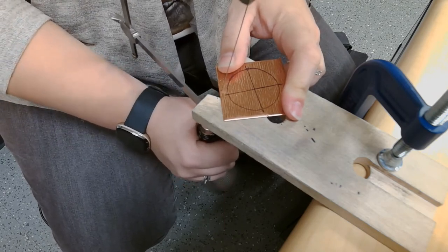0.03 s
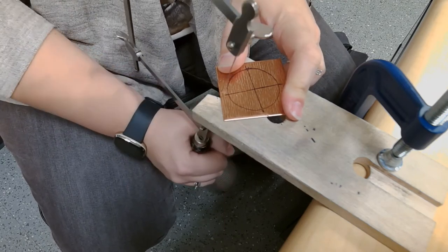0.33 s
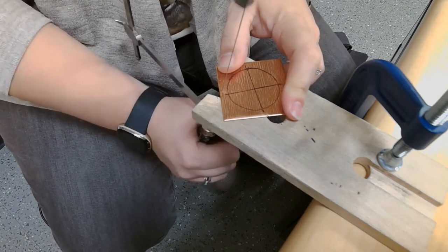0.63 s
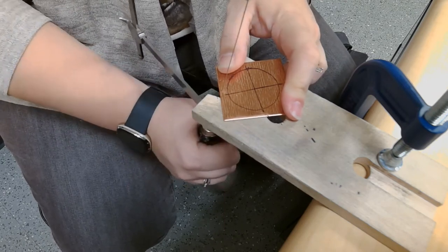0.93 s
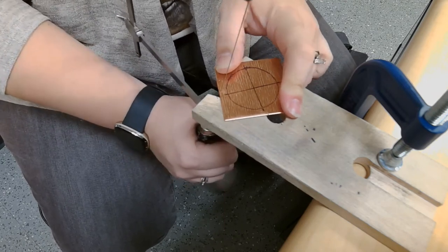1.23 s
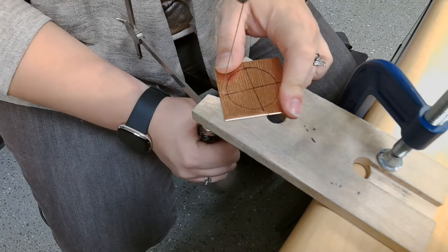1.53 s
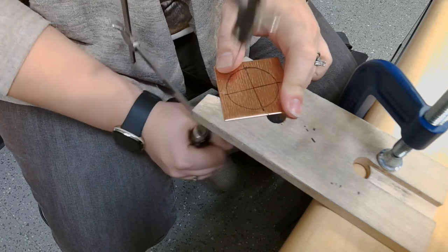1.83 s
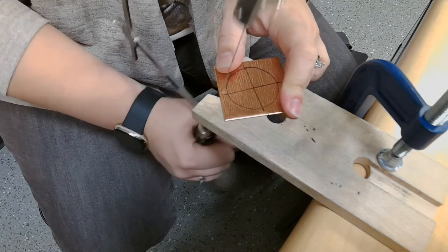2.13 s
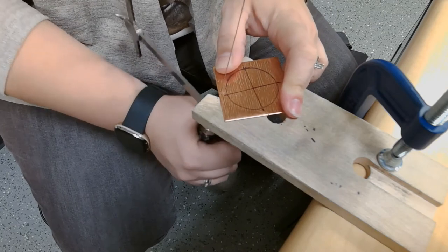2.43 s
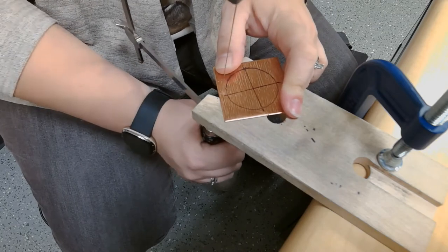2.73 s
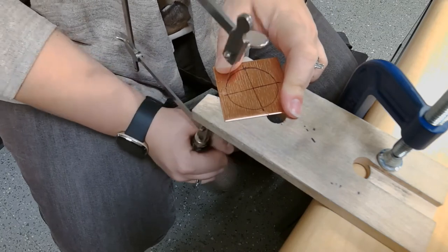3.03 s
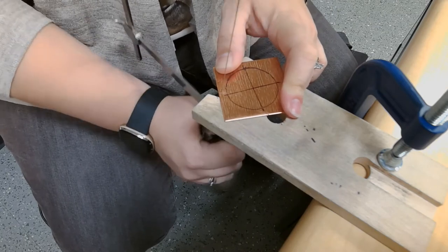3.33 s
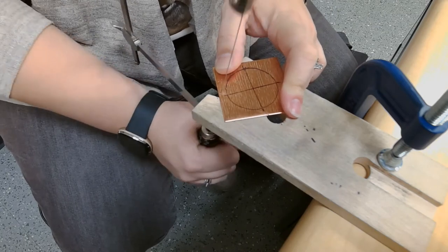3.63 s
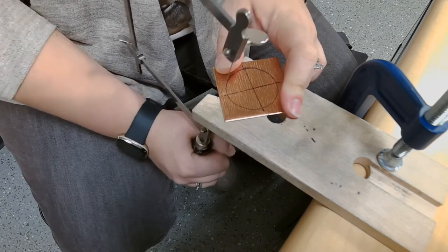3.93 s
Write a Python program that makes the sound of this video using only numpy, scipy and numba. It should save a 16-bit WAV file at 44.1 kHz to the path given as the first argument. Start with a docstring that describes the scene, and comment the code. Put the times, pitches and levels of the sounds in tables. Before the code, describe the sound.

A fine saw cuts copper sheet in short, raspy strokes with brief pauses.

```python
"""Sawing a copper sheet

A jeweller's saw cuts copper held on a wooden bench pin, close by in a dry, quiet workshop.
Each stroke speeds up and slows down; the teeth strike the copper and shake sheet, blade and wood.
Cutting strokes rasp hard and return strokes slide lightly. Caught teeth snap free with sharp ticks,
friction makes the blade squeal briefly, and the steel frame rings faintly."""
import sys
import numpy as np
from scipy import signal
from scipy.fft import rfft, irfft
from scipy.io import wavfile
from scipy.ndimage import uniform_filter1d
from numba import njit

SR = 44100
rng = np.random.default_rng(int(sys.argv[2]) if len(sys.argv) > 2 else 0)


def inscribe(sig):
    """Save sig as 16-bit PCM at rate SR to the path in sys.argv[1].

    A 1-D sig is mono; a 2-D sig holds one channel per row.
    Samples are clipped to [-1, 1] before scaling.
    """
    pcm = np.round(np.clip(np.atleast_2d(sig).T, -1, 1) * 32767)
    wavfile.write(sys.argv[1], SR, pcm.astype(np.int16))


N = 176400  # 4 seconds

# Loudness curves, one for each cutting stroke, return stroke and short nudge of the blade.
# Each row: time in seconds, then relative levels in dB of the rasp, the pin's hum and the bench's thud.
CUT_STROKES = [
    [(.022, -52, -49, -29), (.028, -17.5, -52, -37), (.055, -19, -36, -28.5), (.16, -17.5, -26.5, -25),
     (.225, -27.5, -32, -31.5), (.275, -62, -52, -33.5), (.36, -92, -58, -49)],
    [(1.711, -28.5, -47, -52), (1.745, -18, -30, -28.5), (1.795, -18.5, -40, -34), (1.84, -18, -40.5, -29),
     (1.875, -35, -26, -30.5), (1.905, -52.5, -45, -37), (1.94, -56, -53, -40)],
    [(2.816, -23, -45, -46), (2.86, -14.5, -24, -23.5), (2.895, -18, -35, -33.5),
     (2.945, -16.5, -29.5, -29), (2.975, -26.5, -28.5, -36), (3.0, -36.5, -33.5, -49),
     (3.03, -52, -46, -38)],
    [(3.498, -26, -47, -55), (3.57, -31, -33, -28.5), (3.61, -25, -32.5, -34.5), (3.705, -18, -25, -24.5),
     (3.76, -21, -31.5, -34), (3.825, -22.5, -28.5, -24.5), (3.90, -51, -42.5, -36),
     (3.93, -47.5, -41, -49)],
]
RETURN_STROKES = [
    [(.39, -59.5, -71, -50), (.41, -43, -57.5, -59), (.485, -31.5, -47.5, -49.5), (.535, -31.5, -25, -46),
     (.57, -28.5, -36.5, -41), (.61, -34.5, -33.5, -34.5), (.70, -49.5, -44.5, -36.5),
     (.79, -94.5, -69, -50.5)],
    [(1.94, -55.5, -61, -38.5), (1.99, -36, -45.5, -46.5), (2.09, -29, -41, -47.5), (2.145, -27, -31, -48),
     (2.205, -28, -33, -40), (2.25, -42.5, -34.5, -33.5), (2.31, -62.5, -50, -53.5),
     (2.42, -65.5, -61, -49)],
    [(3.03, -50.5, -53, -42), (3.08, -33, -37.5, -36), (3.16, -28.5, -40, -47), (3.235, -24.5, -23, -43),
     (3.29, -28.5, -34.5, -32.5), (3.33, -49.5, -35, -47), (3.39, -69.5, -55, -62),
     (3.49, -73.5, -59.5, -61)],
    [(3.937, -27.5, -44, -43.5), (4.0, -31.5, -35, -34)],
]
BLADE_NUDGES = [
    [(1.418, -62, -78.5, -58), (1.426, -20, -50, -43), (1.44, -38.5, -49, -43), (1.485, -65, -65, -42),
     (1.53, -98.5, -76, -73)],
    [(2.425, -46, -76, -62), (2.44, -18.5, -52, -43), (2.46, -19, -39.5, -39), (2.495, -44.5, -49, -31.5),
     (2.57, -76, -66.5, -57.5)],
]
# Sweeps of the arm. Each row: start and end in seconds, teeth per second at top speed.
ARM_SWEEPS = [(0.0, 0.279, 563), (0.351, 0.692, 440), (1.40, 1.528, 287), (1.698, 1.921, 672),
              (1.927, 2.321, 492), (2.411, 2.529, 344), (2.80, 3.019, 765), (2.981, 3.381, 461),
              (3.499, 3.90, 548), (3.901, 4.202, 485)]
# Teeth that catch and snap free. Each row: time in seconds, relative level in dB.
TOOTH_SNAGS = [(.134, -8), (.238, -25.5), (.507, -11), (.527, -10), (0.536, -14), (0.547, -13), (.575, -10),
               (.581, -9.5), (.589, -8.5), (.592, -11.5), (0.644, -14.5), (0.665, -15), (.680, -16.5),
               (1.97, -15), (2.006, -18.5), (2.147, -12.5), (2.176, -8), (2.185, -6.5), (2.195, -2.5),
               (2.260, -27.5), (2.557, -34.5), (2.868, -7.5), (2.969, -8.5), (3.191, -14), (3.236, -17.5),
               (3.256, -11), (3.262, -13.5), (3.281, -16.5), (3.513, -14.5), (3.537, -16.5), (3.569, -17),
               (3.624, -9), (3.709, -7), (3.726, -10), (3.810, -7), (3.937, -13.5)]
# Moments when the blade sings. Each row: peak time and half length in seconds, dip of the rasp in dB
# (only values below zero count), and a list of tones, each with pitch in Hz and level in dB.
BLADE_SQUEALS = [(.036, .013, -13.5, [(2480, -34.5), (3830, -34), (5900, -39)]),
                 (.05, .012, 0, [(5840, -26.5)]), (0.158, .018, 0, [(1080, -22)]),
                 (.167, 0.015, -12.5, [(2460, -21), (3800, -20), (4705, -29.5)]),
                 (0.487, 0.027, 0, [(2900, -31.5)]), (1.797, .02, -2, [(2340, -19.5), (3650, -16.5)]),
                 (2.087, 0.02, 0, [(1040, -35.5)]), (2.404, 0.047, 0, [(3700, -55)]),
                 (2.876, .012, 3, [(1540, -21)]), (2.897, 0.021, -8.5, [(2336, -15.5), (2783, -27.5),
                 (3085, -25), (3790, -15), (5690, -28.5)]), (3.49, .07, 0, [(3650, -53)]),
                 (3.749, .016, 0, [(1520, -22.5), (3700, -24), (5830, -31)])]
# Resonances of sheet and blade: the pitches at which they like to ring.
# Each row: pitch in Hz, width in Hz, strength in dB when cutting, strength in dB when sliding back.
SHEET_MODES = [(877, 110, 14.5, 5), (1073, 24, 24, 23), (1525, 90, 14, 12.5), (2438, 120, 12, 8),
               (2820, 92, 0, 3), (3155, 43, 2, -5), (3612, 140, 10.5, 10.5), (3777, 110, 6.5, 5.5),
               (5804, 150, 11.5, 5), (6740, 200, 10, 11), (7430, 230, 10, 5.5), (7790, 620, 7.5, 7.5)]
# Resonances of the wooden pin and the bench. Each row: pitch in Hz, width in Hz, relative level in dB.
PIN_MODES = [(407.3, 19, 1.5), (478.3, 64, -12)]
BENCH_MODES = [(118.6, 15, 1), (156.5, 16.5, 1), (235.3, 24, -4), (292.5, 9.6, -5)]
# Rings of the saw frame. Each row: pitch in Hz, seconds to fade by 60 dB, relative level in dB.
FRAME_RINGS = [(1090, 0.26, -24), (1540, 0.22, -26), (2340, 0.16, -23)]
# Tone colour of cutting, sliding back and the room. Each row: frequency in Hz, relative level in dB.
CUTTING_COLOUR = [(400, -8.5), (680, -10), (1250, -9), (1900, 3.5), (3100, 1), (4300, 2.5), (6200, -16),
                  (8000, -22), (9500, -29.5), (15000, -44.5)]
SLIDING_COLOUR = [(400, -29.5), (700, -9.5), (1200, -6), (1900, 3.5), (3100, 6), (4600, 4), (6200, -6.5),
                  (8000, -22.5), (9500, -25.5), (15000, -34.5)]
ROOM_COLOUR = [(15, -0.5), (69, -12), (87, -28), (127, -17.5), (556, -40), (3750, -55), (15000, -72.5)]

CUT_DB, NUDGE_DB, SNAG_DB, PIN_DB, BENCH_DB = -0.5, -5.5, 15.5, 1, -3  # added to the table levels


def from_db(db):
    """Turn decibels into a number to multiply by."""
    return 10 ** (np.asarray(db) / 20)


def normalise(x):
    """Scale a signal to an average power of 1."""
    return x / np.sqrt(np.mean(x ** 2) + 1e-18)


def steady(x, seconds):
    """Even out the slow swells of a signal but keep its fine grain."""
    power = uniform_filter1d(x ** 2, max(int(seconds * SR), 8))
    return x / np.sqrt(np.abs(power) + 1e-12)


def wander(rate_hz):
    """A smooth random wobble, about 1 in size."""
    hold = max(int(SR / rate_hz), 8)
    steps = rng.standard_normal(N // 8 + 1)[:N // hold + 1]
    return normalise(uniform_filter1d(np.repeat(steps, hold), hold))[:N]


def swell(peak_s, half_s):
    """A rounded rise and fall around one moment."""
    return np.cos(np.pi / 2 * np.clip((np.arange(N) / SR - peak_s) / half_s, -1, 1))


def filtered(x, response):
    """Filter a signal; response(hz) says how each frequency is scaled and delayed."""
    hz = np.arange(8193) * SR / 16384 + 1e-3
    return signal.oaconvolve(x, irfft(response(hz)))[:N]


def colour(hz, points):
    """A filter response that follows (Hz, dB) points and never sounds ahead of its input."""
    point_hz, db = np.array(points).T
    gain = from_db(np.interp(np.log(hz), np.log(point_hz), db))
    cepstrum = irfft(np.log(gain))
    cepstrum[1:len(hz) - 1] *= 2  # fold the part before time zero onto the part after it
    cepstrum[len(hz):] = 0
    return np.exp(rfft(cepstrum))


def resonances(hz, modes):
    """The filter response of several resonances added together."""
    return sum(from_db(db) / (1 + 1j * (hz ** 2 - pitch ** 2) / (hz * width))
               for pitch, width, db in modes)


@njit
def bandpass(x, centre_hz, width_hz):
    """Let through a narrow band around a pitch that may move."""
    out, band_state, low_state = np.empty(len(x)), 0., 0.
    for i in range(len(x)):
        tuning, damping = np.tan(np.pi * centre_hz[i] / SR), width_hz / centre_hz[i]
        band = (band_state + tuning * (x[i] - low_state)) / (1 + tuning * (tuning + damping))
        band_state = 2 * band - band_state
        low_state += 2 * tuning * band
        out[i] = damping * band
    return out


def background(hum_db=-50, air_db=-49.5, air_hz=25.2):
    """The workshop's low hum, with slow puffs of air stirred by the arm."""
    hum = filtered(rng.standard_normal(N), lambda hz: colour(hz, ROOM_COLOUR))
    air = filtered(rng.standard_normal(N), lambda hz: resonances(hz, [(air_hz, 30, 0)]) ** 2)
    air *= from_db(0.57 * wander(13))
    return from_db(hum_db) * normalise(hum) + from_db(air_db) * normalise(air)


def add_echoes(x, echo_db=-13.5, fade_s=0.068):
    """Quick, dense echoes bounce off the bench and the worker."""
    t = np.arange(SR // 2) / SR
    tail = rng.standard_normal(len(t)) * np.exp(-np.log(1000) * t / fade_s) * (t > .003)
    return x + from_db(echo_db) * signal.fftconvolve(x, tail / np.linalg.norm(tail))[:N]


def wood(push, modes, band_hz):
    """The teeth shake a wooden part, which hums at its low resonances."""
    hum = filtered(push, lambda hz: resonances(hz, modes))
    band = signal.butter(3, band_hz, "band", fs=SR, output="sos")
    return steady(signal.sosfilt(band, hum), seconds=0.055)


def squeals(waver=0.011, waver_hz=300, roughness=0.53):
    """Friction locks onto a few resonances and makes brief, rough tones."""
    out = np.zeros(N)
    for peak_s, half_s, _, tones in BLADE_SQUEALS:
        envelope = swell(peak_s, half_s)
        on = envelope > 1e-6
        for hz, db in tones:
            pitch = hz * (1 + waver * wander(waver_hz)[on])
            phase = 2 * np.pi * np.cumsum(pitch) / SR
            flutter = 1 + roughness * wander(waver_hz)[on]
            out[on] += from_db(db) * envelope[on] * flutter * np.sin(phase)
    return out


def snags(scrape=0.33, scrape_s=0.0028, low_cut_hz=1900):
    """A caught tooth snaps free with a click and a scrape, too quick to stir the low resonances."""
    t = np.arange(512) / SR
    push = np.zeros(N + len(t))
    for start_s, db in TOOTH_SNAGS:
        snap = (t == 0) + scrape * rng.standard_normal(len(t)) * np.exp(-t / scrape_s)
        start = int(start_s * SR)
        push[start:start + len(t)] += from_db(db + SNAG_DB) * snap / np.linalg.norm(snap)
    return signal.sosfilt(signal.butter(2, low_cut_hz, "high", fs=SR, output="sos"), push[:N])


def along_blade(push, tone, modes, delay_s=0.001083):
    """Pushes travel along the blade as bending waves, treble first; 3 kHz takes delay_s to arrive."""
    def response(hz):
        shape = colour(hz, tone) * np.exp(-4j * np.pi * delay_s * np.sqrt(3000 * hz))
        ringing_power = np.mean(np.abs(shape * (1 + resonances(hz, modes))) ** 2)
        return shape / np.sqrt(ringing_power)  # keeps the ringing metal about as strong as the push
    return filtered(push, response)


def ringing_metal(push, modes, drift=0.008, drift_hz=12, swell_db=2.5):
    """Sheet and blade ring, their resonances shifting as the contact point moves; the frame rings on."""
    out = push.copy()
    for hz, width, db in modes:
        ring = bandpass(push, hz * (1 + drift * wander(drift_hz)), float(width))
        out += from_db(db + swell_db * (wander(drift_hz) - .5)) * ring
    for hz, fade_s, db in FRAME_RINGS:
        width = np.log(1000) / (np.pi * fade_s)
        out += from_db(db) * 200 / width * bandpass(push, np.full(N, float(hz)), width)
    return out


def stroke_gains(strokes, ease_s=0.0035):
    """How strong rasp, pin and bench are over time, easing smoothly in and out."""
    t = np.arange(N) / SR
    gains = np.zeros((3, N))
    for stroke in strokes:
        times, *levels = np.array(stroke).T
        gains += [from_db(np.interp(t, times, db, left=-150, right=-150)) for db in levels]
    return uniform_filter1d(gains, int(ease_s * SR))


def tooth_rate(slowest_hz=109.2, roundness=.8):
    """Teeth passing per second: each sweep of the arm speeds up, then slows down."""
    t = np.arange(N) / SR
    rate = np.full(N, slowest_hz)
    for start, end, top_rate in ARM_SWEEPS:
        progress = np.clip((t - start) / (end - start), 0, 1)
        rate = np.maximum(rate, top_rate * np.abs(np.sin(np.pi * progress)) ** roundness)
    return rate


def teeth(rate, jitter, scatter_db, grit, grit_cycles):
    """Each tooth makes one uneven click, followed by the gritty noise of its chip."""
    teeth_passed = np.cumsum(rate * np.exp(jitter * wander(300))) / SR
    tooth = teeth_passed.astype(int)
    strength = from_db(scatter_db * np.clip(rng.standard_normal(N), -2, 2))[tooth]
    clicks = np.diff(tooth, prepend=0) * strength
    chips = strength * np.exp(-(teeth_passed % 1) / grit_cycles) * rng.standard_normal(N)
    return normalise(clicks) + grit * normalise(chips)


def rasp(push, gain, chatter_db, chatter_hz):
    """Teeth scrape the copper as the blade chatters in its slot; they bite less in some squeals."""
    dip_db = sum(min(db, 0) * swell(peak_s, half_s) for peak_s, half_s, db, _ in BLADE_SQUEALS)
    chatter = from_db(chatter_db * wander(chatter_hz))
    return gain * from_db(dip_db) * steady(push * chatter, seconds=0.021)


def scene():
    """The saw cuts, slides back, snags and squeals, shaking the wood in the quiet room."""
    rate = tooth_rate()
    cut, back, nudge = map(stroke_gains, (CUT_STROKES, RETURN_STROKES, BLADE_NUDGES))
    pressed = [(hz, width, db) for hz, width, db, _ in SHEET_MODES]
    loose = [(hz, width, db) for hz, width, _, db in SHEET_MODES]
    biting = teeth(rate, jitter=.04, scatter_db=3.5, grit=1.0, grit_cycles=1.0)
    sliding = teeth(rate, jitter=.035, scatter_db=1.5, grit=3.7, grit_cycles=0.86)
    cutting = from_db(CUT_DB) * rasp(biting, cut[0], chatter_db=2, chatter_hz=197.7)
    cutting += from_db(NUDGE_DB) * rasp(sliding, nudge[0], chatter_db=2, chatter_hz=251.4)
    returning = rasp(sliding, back[0], chatter_db=1.9, chatter_hz=163)
    saw = ringing_metal(along_blade(cutting, CUTTING_COLOUR, pressed), pressed)
    saw += ringing_metal(along_blade(returning + snags(), SLIDING_COLOUR, loose), loose)
    saw += squeals()
    # Cuts jolt the wood unevenly; returns and nudges bump it more regularly.
    jolting = teeth(rate, jitter=.14, scatter_db=4.5, grit=1.0, grit_cycles=1.0)
    bumping = teeth(rate, jitter=.045, scatter_db=1.5, grit=0.92, grit_cycles=0.35)
    for push, (_, pin_gain, bench_gain) in ((jolting, cut), (bumping, back + nudge)):
        saw += from_db(PIN_DB) * pin_gain * wood(push, PIN_MODES, band_hz=(273, 580))
        saw += from_db(BENCH_DB) * bench_gain * wood(push, BENCH_MODES, band_hz=(100, 294))
    return (add_echoes(saw) + background())[None]


def record(dry):
    """Cut away the highest treble, above 15300 Hz."""
    return signal.sosfilt(signal.ellip(8, .2, 70, 15300, fs=SR, output="sos"), dry)


dry = scene()
out = record(dry)
inscribe(out)
```